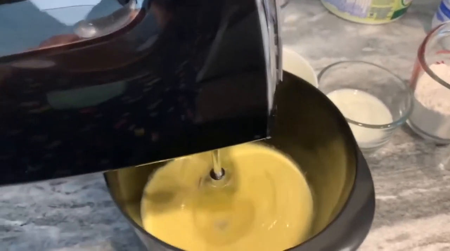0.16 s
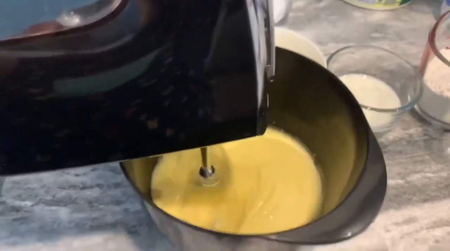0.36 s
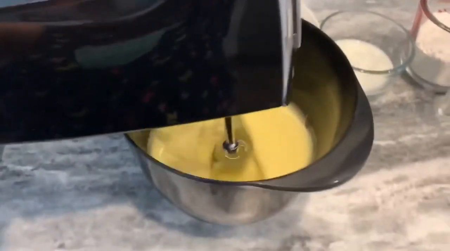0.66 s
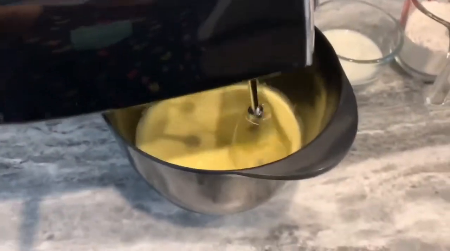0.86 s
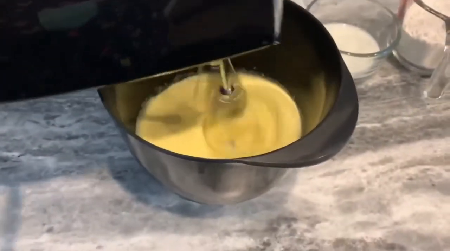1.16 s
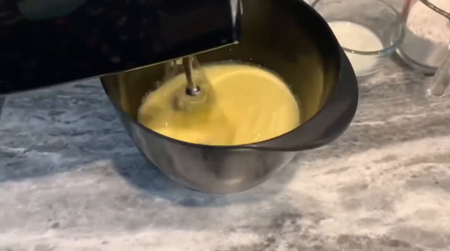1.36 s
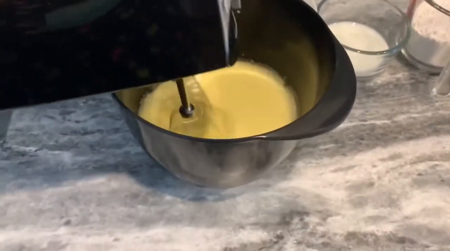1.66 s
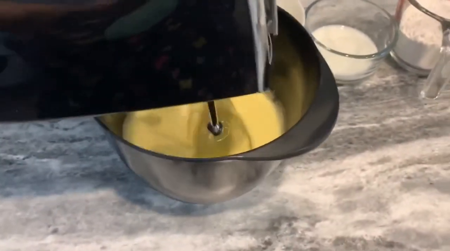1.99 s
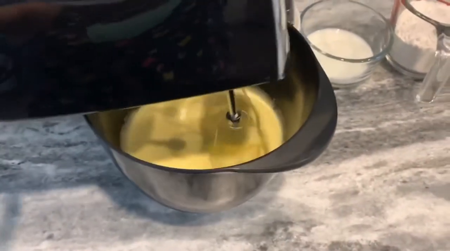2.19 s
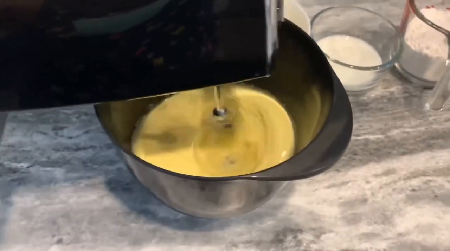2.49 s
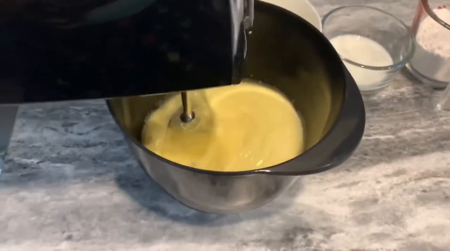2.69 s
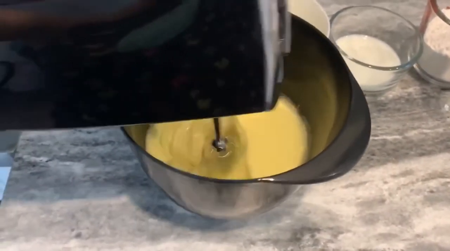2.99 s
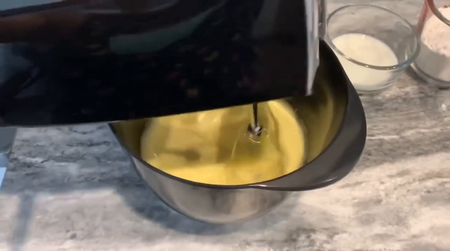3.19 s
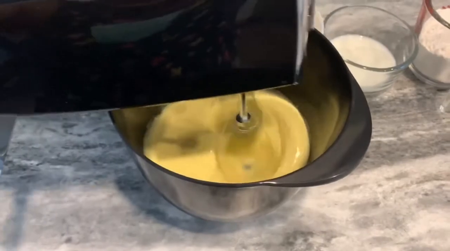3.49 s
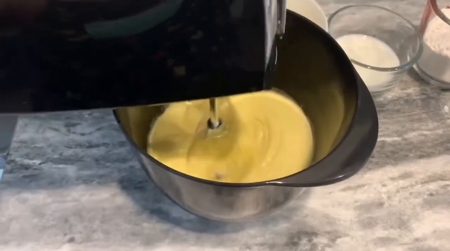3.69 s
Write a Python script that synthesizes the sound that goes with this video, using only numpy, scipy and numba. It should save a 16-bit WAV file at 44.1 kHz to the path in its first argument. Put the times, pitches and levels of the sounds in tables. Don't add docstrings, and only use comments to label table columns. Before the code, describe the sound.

Electric hand mixer running nonstop, buzzing and hissing, with wire ticks and bowl knocks close up

```python
import sys
import numpy as np
from scipy import signal
from scipy.io import wavfile
from scipy.ndimage import uniform_filter1d
from numba import njit

SR = 44100
rng = np.random.default_rng(int(sys.argv[2]) if len(sys.argv) > 2 else 0)


def master(y):
    cut = np.clip(np.atleast_2d(y).T, -1, 1)
    pcm = np.round(cut * 32767)
    wavfile.write(sys.argv[1], SR, pcm.astype(np.int16))


def magnitude_from_level(level_db):
    exponent = np.asarray(level_db, float) / 20
    return 10 ** exponent


N = 169785
GEAR_PER_SHAFT, BEATER_PER_SHAFT = 4 / 17, 4 / 85


def level(x, db):
    return x * magnitude_from_level(db) / np.sqrt(np.mean(x ** 2))


@njit
def svf(x, hz, width):
    y, b, l = np.empty(len(x)), 0., 0.
    for i in range(len(x)):
        g, k = np.tan(np.pi * hz[i] / SR), width / hz[i]
        v = (b + g * (x[i] - l)) / (1 + g * (g + k))
        b, l, y[i] = 2 * v - b, l + 2 * g * v, k * v
    return y


def band(x, hz, width_hz):
    return svf(x, hz + np.zeros(len(x)), 1. * width_hz)


def noise_band(hz, first_width_hz, second_width_hz):
    return band(band(rng.standard_normal(N), hz, first_width_hz), hz, second_width_hz)


def smooth_twice(x, size):
    return uniform_filter1d(uniform_filter1d(x, size), size)


def walk(rate_hz):
    hold = int(SR / rate_hz)
    held = np.repeat(rng.standard_normal(N + 1)[:N // hold + 1], hold)
    return 1.42 * smooth_twice(held, hold)[:N]


def control(table, column):
    rows = np.array(table)
    return np.interp(np.arange(N) / SR, rows[:, 0], rows[:, column])


def add(out, start_s, x):
    i = max(int(start_s * SR), 0)
    out[i:i + len(x)] += x[:N - i]


# start_s, shaft_hz
SHAFT_SPEED = [(0, 250.9), (.15, 251.6), (.5, 252.3), (1.3, 251.9), (1.9, 252.2), (2.5, 252.7),
               (3.0, 253.1), (3.85, 253.0)]


def shaft_hz():
    return control(SHAFT_SPEED, 1)


# shaft_multiple, level_db, wander_db
SHAFT_ORDERS = [(1, -38.5, 1.2), (3, -51.5, 2.5), (5, -47.5, 2), (6, -54.5, 2.5), (20, -57, 3)]
# start_s, order_10_db, order_12_db
SINGING_ORDERS = [(0, -38, -47), (.08, -43, -41.5), (.14, -54, -39), (.3, -52, -40.5), (.45, -58, -52),
                  (.55, -47, -58), (.75, -43, -54), (.95, -49, -52), (1.2, -48, -46.5), (1.45, -46, -53),
                  (1.6, -43, -55), (1.95, -44, -54), (2.1, -50, -56), (2.42, -52, -56), (2.52, -44.5, -54),
                  (2.85, -45, -60), (3.0, -49, -60), (3.25, -42, -58), (3.85, -42.5, -58)]


def motor(turns):
    def tone(order, db):
        return np.sqrt(2) * magnitude_from_level(db) * np.sin(2 * np.pi * order * turns + order * order)

    out = np.zeros(N)
    for column, order in ((1, 10), (2, 12)):
        out += tone(order, control(SINGING_ORDERS, column) + 3.3 + 2.2 * walk(12))
    for order, db, wander_db in SHAFT_ORDERS:
        out += tone(order, db + wander_db * walk(8.3))
    return out


# start_s, churn_db, gear_ring_hz, hiss_db
MIXER_MOVES = [(0, -30.5, 3185, -32.5), (.15, -28, 3150, -33.5), (.36, -30.5, 3010, -32.5),
               (.65, -31, 3010, -32), (.95, -30, 2980, -33.5), (1.2, -29, 3140, -34.5),
               (1.5, -28.5, 2900, -30), (1.72, -30, 2906, -33.5), (1.95, -27.5, 3020, -31),
               (2.25, -29.5, 2960, -32), (2.55, -30.5, 3000, -35.5), (2.8, -28, 2910, -29.5),
               (3.05, -30, 2876, -31.5), (3.4, -28, 2880, -33), (3.6, -30.5, 3020, -33.5),
               (3.85, -29.5, 2820, -34)]


def gears(turns):
    mesh_hz = shaft_hz() * GEAR_PER_SHAFT
    ring_hz = np.clip(control(MIXER_MOVES, 2), 2820, 3010)
    ring_width_hz, scatter_db = 140, 3
    out = np.zeros(N)
    for k in range(46, 56):
        if k == 51:
            continue
        lift = 1 / (1 + ((k * mesh_hz - ring_hz) / ring_width_hz) ** 2)
        scatter = magnitude_from_level(scatter_db * walk(7))
        phase = 2 * np.pi * k * turns * GEAR_PER_SHAFT + k * k * np.pi / 7 + walk(10)
        out += lift * scatter * np.sin(phase)
    return level(out, -43)


# center_hz, width_hz, level_db
BODY_MODES = [(76.4, 19, -10), (112, 8.5, -13.5), (456, 163, -4), (634, 31, -2.5), (970, 27, -14.5),
              (1208, 180, -4.5), (1486, 220, -10), (1948, 140, -12), (2492, 150, -12), (2950, 660, -7.5)]


def churn(turns):
    throb_db, flicker_db = 2, 1
    throb = np.cos(2 * np.pi * (turns * BEATER_PER_SHAFT + 0.3 * walk(3.94)))
    throb = throb * (1 + .5 * walk(2.5))
    out = np.zeros(N)
    for hz, width_hz, db in BODY_MODES:
        ring = level(noise_band(hz, width_hz, 4.04 * width_hz), db)
        out += ring * magnitude_from_level((hz > 300) * throb_db * throb + flicker_db * walk(12))
    return level(out, -0.5) * magnitude_from_level(control(MIXER_MOVES, 1))


# start_s, peak_db, ring_hz
BOWL_KNOCKS = [(0.229, -15, 620), (0.352, -12, 614), (0.784, -14.5, 1290), (0.934, -15, 447),
               (1.201, -12, 630), (1.281, -11, 635), (1.371, -8.5, 1170), (1.404, -15, 594),
               (1.438, -8, 329), (1.465, -18, 630), (1.529, -8, 507), (1.559, -10.5, 620),
               (1.616, -6.5, 634), (1.863, -28, 637), (1.957, -13, 1203), (2.33, -10.5, 490),
               (2.416, -21, 630), (2.542, -16.5, 440), (2.718, -11.5, 1170), (2.809, -10.5, 1459),
               (3.012, -8, 1108), (3.086, -10, 688), (3.099, -18, 656), (3.21, -11, 614), (3.25, -16, 1210),
               (3.266, -7.5, 600), (3.332, -18, 640), (3.398, -21, 630), (3.465, -15, 1210),
               (3.566, -16, 670)]
# pitch_hz, level_db, t60_s
BOWL_MODES = [(472, -1.5, 0.009), (670, -37, 0.036), (1170, -8.5, 0.13), (1510, -0.5, 0.016)]


def knocks():
    push_s, ring_t60_s, trim_db = .012, 0.098, -8.5
    out, t = np.zeros(N), np.arange(5000) / SR
    for start_s, peak_db, ring_hz in BOWL_KNOCKS:
        push = rng.standard_normal(5000) * np.exp(-t / push_s * 2)
        ring = np.zeros(5000)
        for hz, db, t60_s in BOWL_MODES + [(ring_hz, 0, ring_t60_s)]:
            ring += magnitude_from_level(db) * np.sin(2 * np.pi * hz * t) * np.exp(-np.log(1000) * t / t60_s)
        x = signal.fftconvolve(push, ring)[:5000]
        add(out, start_s - .002, x / np.abs(x).max() * magnitude_from_level(peak_db + trim_db))
    return out


# start_s, peak_db, low_ring_db (against the peak)
WIRE_TICKS = [(0.0608, -27, -9), (0.0777, -25, -10), (0.174, -18, -14), (0.3047, -21, -13),
              (0.3301, -15, -19), (0.3516, -19, -13), (0.3755, -24, -7), (0.4349, -28, -6),
              (0.6409, -28, -4), (0.7068, -20, -8), (0.7262, -22, -9), (0.8849, -28, -5), (1.0116, -27, -8),
              (1.06, -25, -9), (1.279, -23, -12), (1.3678, -21, -10), (1.4361, -22, -12), (1.502, -25, -8),
              (1.5459, -26, -6), (1.5708, -22, -7), (1.6591, -22, -10), (1.733, -20, -12),
              (1.7524, -19, -9), (1.7759, -17, -11), (1.7978, -25, -5), (1.8357, -21, -9),
              (1.8597, -24, -11), (1.8796, -20, -12), (1.9405, -21, -13), (1.9784, -21, -12),
              (2.0443, -25, -6), (2.0797, -24, -1), (2.1026, -19, -3), (2.1635, -25, -5), (2.2109, -25, -6),
              (2.2667, -26, -9), (2.3226, -24, -6), (2.358, -24, -9), (2.4623, -25, -11), (2.6324, -27, -8),
              (2.6958, -24, -9), (2.7152, -23, -7), (2.7621, -20, -9), (2.8035, -25, -2), (2.825, -20, -11),
              (2.8714, -19, -11), (2.8943, -20, -9), (2.9238, -18, -14), (2.9437, -21, -11),
              (2.9682, -19, -12), (2.9916, -23, -6), (3.0704, -20, -8), (3.0849, -19, -13),
              (3.1677, -21, -7), (3.1857, -14, -12), (3.2475, -20, -11), (3.3957, -18, -8),
              (3.4321, -22, -4), (3.6651, -22, -13), (3.6895, -27, -8)]


def ticks():
    contrast = 1.35
    out, t = np.zeros(N), np.arange(1500) / SR
    for start_s, peak_db, low_db in WIRE_TICKS:
        chance = rng.standard_normal(1500)
        hard = peak_db + low_db > -28.5
        shape = t * np.exp(-t / .0017 / (1.6 if hard else 1))
        bright_db = (peak_db + 20) * contrast - 20.5
        lower_db = (peak_db + low_db + 26) * contrast - 17
        for hz, db in ((10700, bright_db), (5600, lower_db)):
            x = shape * band(band(chance, hz, 4000), hz, 6000)
            add(out, start_s - .0015, x / np.abs(x).max() * magnitude_from_level(db))
    return out


def spatter():
    drops_per_s, spread_db = 150, 2.5
    drops = (rng.random(N) < drops_per_s / SR) * magnitude_from_level(spread_db * rng.exponential(size=N))
    bursts = smooth_twice(drops, 60) * rng.standard_normal(N)
    return level(band(bursts, 6900, 6000), -52)


# start_s, peak_db, decay_s
RIM_CRACKS = [
    (1.7765, -18, .002),
    (2.1035, -15, .0022),
    (2.968, -21, .002),
    (3.0715, -19, .0015),
    (3.186, -15, .002),
    (3.396, -15.5, .004),
    (3.4325, -19, .0015),
]


def cracks():
    hz, width_hz = 7500, 12000
    out, t = np.zeros(N), np.arange(1000) / SR
    for start_s, peak_db, decay_s in RIM_CRACKS:
        x = band(band(rng.standard_normal(1000), hz, width_hz), hz, width_hz)
        x = x * np.exp(-t / decay_s) * np.minimum(t / .0004, 1)
        add(out, start_s, x / np.abs(x).max() * magnitude_from_level(peak_db))
    return out


# center_hz, width_hz, level_db
VENT_BANDS = [(3880, 260, -12), (4713, 1400, -5), (6753, 3700, 1), (8736, 1700, -9.5), (9760, 1600, -5),
              (10715, 3000, -1.5)]


def fan():
    shared_db = walk(30)
    out = np.zeros(N)
    for hz, width_hz, db in VENT_BANDS:
        hiss = level(noise_band(hz, width_hz, width_hz), db)
        out += hiss * magnitude_from_level(shared_db + 1.6 * walk(22))
    return level(out, -0.22) * magnitude_from_level(control(MIXER_MOVES, 3))


# pitch_hz, level_db (per hertz)
RUMBLE_SPECTRUM = [(30, 2.5), (60, -9), (200, 1), (350, -6), (800, -6), (1700, 0), (3300, -10.5),
                   (4000, -24)]


def rumble():
    rows = np.array(RUMBLE_SPECTRUM)
    out = np.zeros(N)
    for hz in 35 * 2 ** np.arange(0, 7, .5):
        db = np.interp(np.log(hz), np.log(rows[:, 0]), rows[:, 1]) + 1.5 * walk(7.4)
        out += magnitude_from_level(db) * noise_band(hz, hz / 3.5, hz / 1.3)
    return level(out, -34)


def scene():
    turns = np.cumsum(shaft_hz() * (1 + .0008 * walk(6))) / SR
    machine = motor(turns) + gears(turns) + churn(turns) + rumble() + fan()
    strikes = knocks() + ticks() + spatter() + cracks()
    mono = machine + strikes
    return np.array([mono, mono])


# start_s, treble_db, middle_db
DROPOUT_HUNGER = [(0, 0, -.5), (.17, 2.5, -.5), (.25, -1, 0), (.37, 4, .8), (.46, 0, 0), (.85, .8, 1),
                  (1.2, 1, 1.5), (1.4, 0, 2.7), (1.53, 3.2, 1.4), (1.68, -.5, 2), (1.95, 3, 2.2),
                  (2.22, -1.5, 2), (2.36, 1.5, .8), (2.58, -3, 1.4), (2.72, 3.5, 2.6), (2.9, 2.5, .5),
                  (3.1, -1, .8), (3.37, 1.5, 1.8), (3.85, -.5, .8)]


def starve(x):
    threshold_db, wander_db, line_db = -4.2, .9, -2
    hz, s, z = signal.stft(x, SR, "cosine", 2048, 1024)
    at = np.minimum((s * SR).astype(int), N - 1)
    edges = np.r_[1500 * 1.055 ** np.arange(30), np.arange(7650, 12000, 620), SR]
    which = np.searchsorted(edges, hz)
    power = np.array([np.mean(np.abs(z[which == k]) ** 2, axis=0) for k in range(len(edges))]) + 1e-18

    mask = uniform_filter1d(power, size=11, axis=0)
    contrast = power / mask
    depth = contrast ** .25 * np.median(contrast, axis=1, keepdims=True) ** .75

    treble = edges[:, None] > 7000
    hunger = np.where(treble, .6 + control(DROPOUT_HUNGER, 1)[at], control(DROPOUT_HUNGER, 2)[at])
    drift = np.where(treble, 1.9, .8) * walk(40)[at]
    patches = uniform_filter1d(rng.standard_normal(power.shape), size=2, axis=0)
    patches = uniform_filter1d(patches, size=2, axis=1)
    mood = wander_db * (drift + 1.6 * patches)
    keep = depth > magnitude_from_level(2 * (threshold_db + hunger + mood))
    keep[0] = keep[-2:] = True

    line_floor = np.sqrt(mask * power)[which] * magnitude_from_level(2 * line_db)
    strong = (np.abs(z) ** 2 > line_floor) | (hz[:, None] < 1100)
    bright = power[-5] > 2.3 * np.median(power[-5])
    top_hz = 11800 + 120 * walk(12)[at] + 300 * bright
    near_crack = np.any(np.abs(s[:, None] - np.array(RIM_CRACKS)[:, 0]) < .016, axis=1)
    spared = near_crack & (hz[:, None] < 12400)
    passed = strong & (keep[which] & (hz[:, None] < top_hz) | spared)
    return signal.istft(z * passed, SR, "cosine", 2048, 1024)[1][:N]


def top_cut(x):
    return signal.sosfilt(signal.butter(12, 12450, fs=SR, output="sos"), x)


def record(dry):
    thin_bass = signal.butter(2, 45, "high", fs=SR, output="sos")
    mono = starve(signal.sosfilt(thin_bass, dry[0]))
    return top_cut(np.array([mono, mono]))


dry = scene()
out = record(dry)
master(out)
```